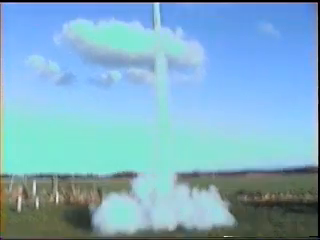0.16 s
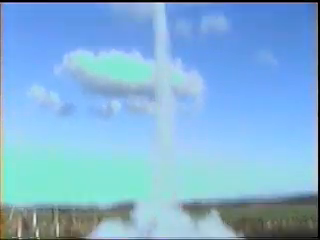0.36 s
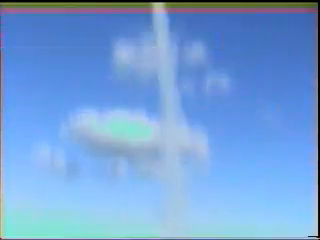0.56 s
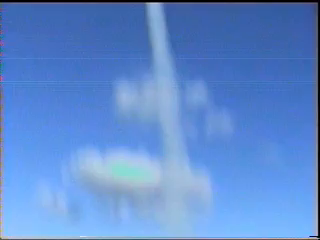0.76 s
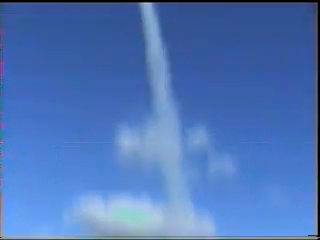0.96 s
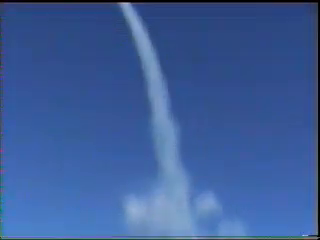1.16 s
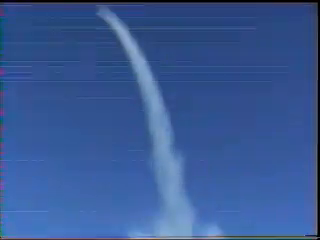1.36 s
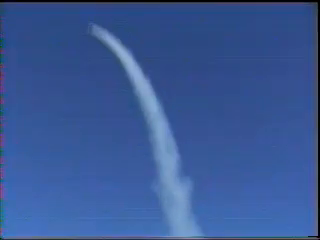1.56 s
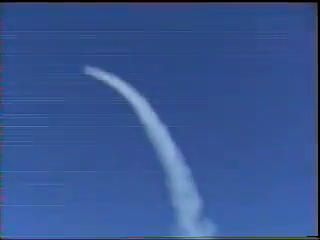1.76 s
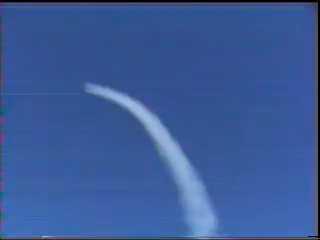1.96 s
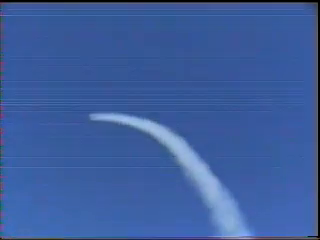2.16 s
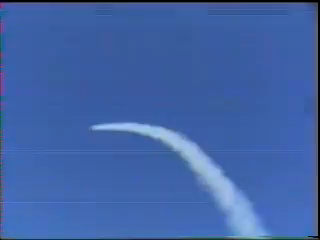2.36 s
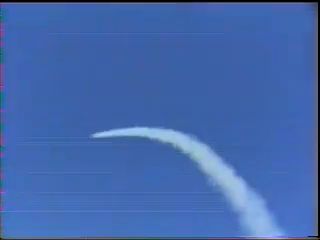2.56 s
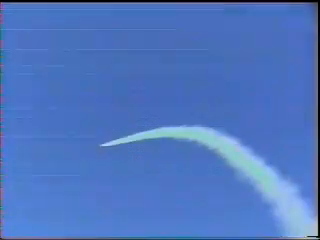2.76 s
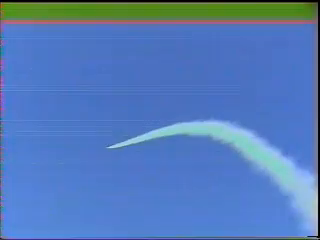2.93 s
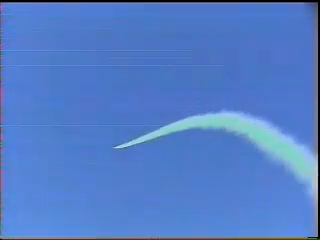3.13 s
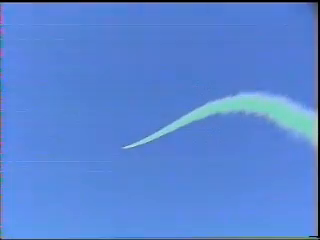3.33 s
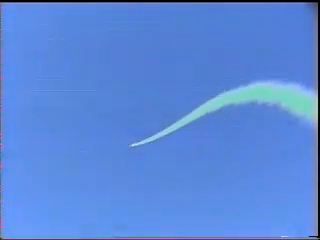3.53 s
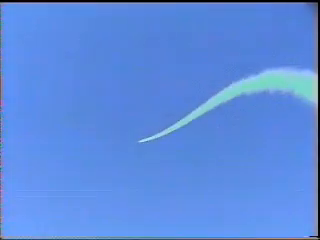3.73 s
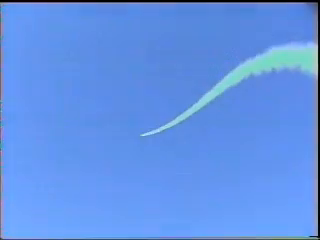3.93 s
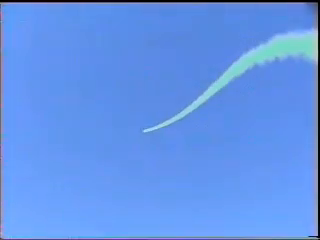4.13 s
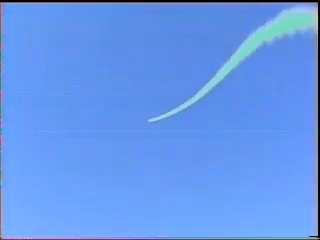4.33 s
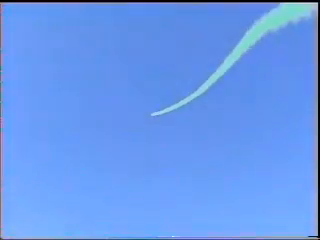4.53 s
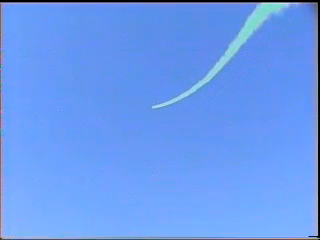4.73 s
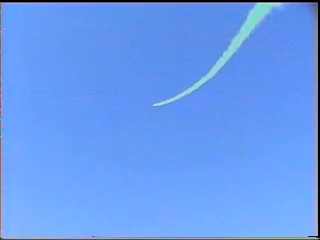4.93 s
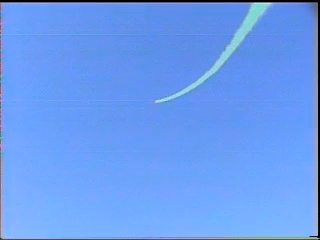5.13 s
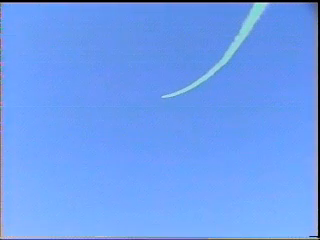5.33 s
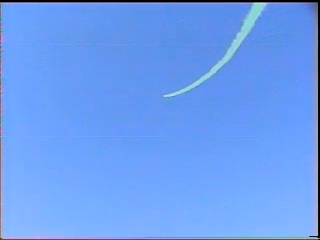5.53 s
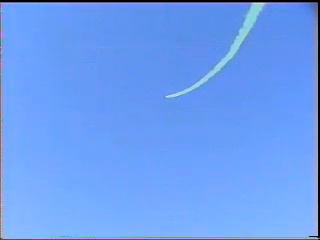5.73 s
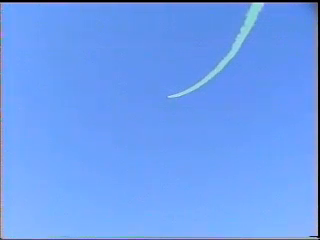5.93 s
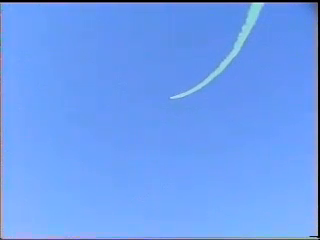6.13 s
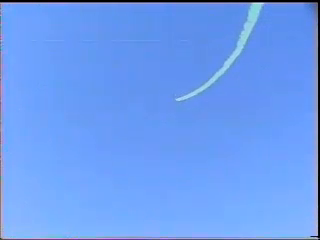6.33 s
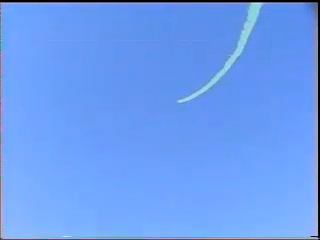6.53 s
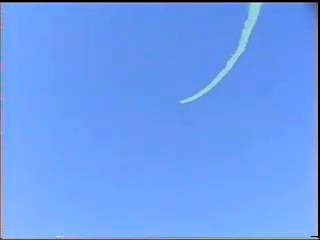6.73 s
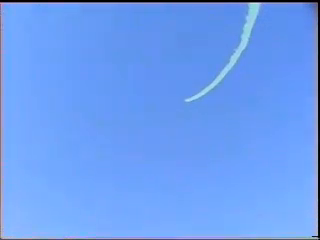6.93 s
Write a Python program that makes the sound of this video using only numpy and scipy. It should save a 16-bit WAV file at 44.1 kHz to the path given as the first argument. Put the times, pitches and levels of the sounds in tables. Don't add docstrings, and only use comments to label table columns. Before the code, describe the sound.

The sound starts mid-roar at 0 s: a solid-fuel hobby rocket leaving its pad about ten metres away on an open grass field. The exhaust is a dense, turbulent rush with strong hiss, slightly crushed and gritty on an old camcorder. From about 0.6 to 2 s it eases as the rocket climbs, fluttering and surging irregularly. Around 2.7 s the hiss brightens a little as the nozzle swings past, then from 3 to 5 s the treble drains away and the roar becomes duller and more midrange, coloured by a short ground echo. By 5 to 6 s it is a distant, muffled rumble, dropping further at 6 s over faint tape hiss and thin whine. At about 6.37 s a small crack and louder dull pop come almost together, with a brief rumble; sound cuts to silence at 6.43 s. Nearly everything is left; the right has only faint leakage and buzz.

```python
import sys
import numpy as np
from scipy import signal
from scipy.fft import rfft, irfft
from scipy.io import wavfile
from scipy.ndimage import uniform_filter1d

SR = 44100
rng = np.random.default_rng(int(sys.argv[2]) if len(sys.argv) > 2 else 0)


def attenuation_scalar(level_db):
    decades = np.asarray(level_db, float) / 20
    return 10 ** decades


def store_wav(level_fs):
    pcm = np.round(np.clip(np.atleast_2d(level_fs), -1, 1) * 32767)
    wavfile.write(sys.argv[1], SR, pcm.T.astype(np.int16))


N = 308011


def level(x, db):
    return x * attenuation_scalar(db) / np.sqrt(np.mean(x ** 2))


def shaped(points, x):
    hz = np.arange(N // 2 + 1) * SR / N + 1e-3
    at_hz, db = np.transpose(points)
    gain_db = np.interp(np.log(hz), np.log(at_hz), db, right=-120)
    return hz, rfft(x) * attenuation_scalar(gain_db)


def walk(rate):
    hold = int(SR / rate)
    steps = np.repeat(rng.standard_normal(N // hold + 1), hold)
    slewed = uniform_filter1d(uniform_filter1d(steps, hold), hold)
    return 1.3 * slewed[:N]


# start_s [s], level_db of the roar [dB], path_m through the air [m]
FLIGHT_PATH = [(0.0, -29, 10), (0.3, -29, 50), (0.6, -32, 51), (1.0, -32.5, 110), (1.75, -33, 100),
               (2.25, -34.5, 120), (2.75, -34, 220), (3.0, -35, 150), (3.3, -33, 250), (3.75, -33, 325),
               (4.25, -35, 400), (4.75, -35, 465), (5.25, -37, 635), (5.5, -38, 760), (5.75, -38, 720),
               (6.0, -42, 700), (6.34, -42.3, 930)]
# pitch_hz [Hz], level_db [dB per Hz]
EXHAUST_COLOUR = [(20, -14.5), (60, -13), (120, -9.5), (340, -5), (650, -4), (1130, -2.5), (1820, -4.5),
                  (2370, -3), (2800, -6.5), (3600, -22.5), (4400, -28), (5200, -35.5), (6200, -50.5),
                  (8000, -65)]
TILT_ANCHORS_HZ = [45, 250, 2400, 4300]


def exhaust_tilts(t, roar_db, path_km):
    aim_db = 2.5 * np.exp(-((t - 2.68) / 0.5) ** 2)
    hiss_db = aim_db - 14.5 * path_km
    sizzle_db = -44.5 * path_km
    thinning = attenuation_scalar(-1.0 * t - 44.5 * path_km)
    murmur = attenuation_scalar(-59.5 - roar_db)
    rumble_db = 10 * np.log10(thinning ** 2 + murmur ** 2)
    return [db - np.mean(db) for db in (rumble_db, 0 * roar_db, hiss_db, sizzle_db)]


def rocket(gain_db=11.0, shift=-0.59, flicker_db=1.0, steep=0.024, surge_db=0.24):
    t = np.arange(N) / SR
    start_s, *columns = np.transpose(FLIGHT_PATH)
    roar_db, path_m = (np.interp(t, start_s, c) for c in columns)
    tilts = exhaust_tilts(t, roar_db, path_m / 1000)
    hz, spectrum = shaped(EXHAUST_COLOUR, rng.standard_normal(N))
    spectrum = spectrum / np.std(irfft(spectrum, N))
    out, surge, patch = 0, walk(9), walk(3)
    for octave in np.arange(-17, 10) / 3:
        centre_hz = 1000 * 2 ** octave
        overlap = np.clip(1 - 3 * abs(np.log2(hz / centre_hz)), 0, 1)
        band = irfft(spectrum * overlap, N)
        patch = (patch + walk(4)) / np.sqrt(2)
        tilt_db = 0
        for weights, change_db in zip(np.eye(4), tilts):
            tilt_db = tilt_db + np.interp(np.log(centre_hz), np.log(TILT_ANCHORS_HZ), weights) * change_db
        mids = max(1 - abs(np.log2(centre_hz / 800)), 0)
        tilt_db = tilt_db + mids * shift * tilts[2]
        out = out + band * attenuation_scalar(tilt_db + 0.4 * patch + flicker_db * walk(14))
    out = out + steep * (out ** 2 - uniform_filter1d(out ** 2, size=120))
    return out * attenuation_scalar(roar_db + gain_db + surge_db * surge)


# start_s [s], peak [full scale], pitch_hz of the swing [Hz], dip before it [share of peak]
MOTOR_POPS = [
    (6.3662, .12, 560, 1.1),
    (6.3732, .37, 195, .6),
    (6.382, .03, 420, .7),
]


def motor_pops():
    t, out = np.arange(N) / SR, 0
    for start_s, peak, pitch_hz, dip_share in MOTOR_POPS:
        turn = (t - start_s) * pitch_hz
        dip = dip_share * np.exp(-((turn + .45) / .27) ** 2)
        slam = np.exp(-(turn / .135) ** 2)
        settling = .2 * np.exp(-((turn - .4) / .25) ** 2)
        out = out + peak * (slam - settling - dip)
    out = signal.sosfilt(signal.butter(1, 30, "high", fs=SR, output="sos"), out)
    since_s = np.maximum(t - 6.352, 0)
    attack_s, rumble_db, fall_db_per_s = 0.0097, -30, 141.5
    swell = np.minimum(since_s / attack_s, 1) ** 2 * attenuation_scalar(rumble_db - fall_db_per_s * since_s)
    low_band = signal.butter(2, [120, 700], "band", fs=SR, output="sos")
    rumble = signal.sosfilt(low_band, rng.standard_normal(N))
    return out + level(rumble, 0) * swell


GRASS_SHARES = (0.08, 0.94)
CAMERA_SHARES = (0.037, 0.21)


def field(x):
    n = np.arange(N)
    t = n / SR
    lag_ms = 22.3 + 8.0 * np.exp(-t / 1.7)
    overhead, grazing = GRASS_SHARES
    ground = overhead + (grazing - overhead) / (1 + np.exp((4.7 - t) / 0.45))
    camera_level, camera_up = CAMERA_SHARES
    body = camera_level + (camera_up - camera_level) * np.exp(-((t - 3.3) / 1.8) ** 2)
    dull = signal.filtfilt(*signal.butter(1, 880, fs=SR), x)
    ground_echo = ground * np.interp(n - lag_ms * SR / 1000, n, dull)
    body_echo = body * np.interp(n - 1.3 * SR / 1000, n, x)
    return x + ground_echo + body_echo


# pitch_hz [Hz], level_db [dB per Hz]
TAPE_HISS = [(20, -40.5), (100, -12.5), (400, -3), (3000, -25.5), (6200, -25.5)]


def camcorder():
    t = np.arange(N) / SR
    _, spectrum = shaped(TAPE_HISS, rng.standard_normal(N))
    hiss = level(irfft(spectrum, N), -55.5)
    whine = level(np.sin(2 * np.pi * 4427 * t), -65)
    return hiss + whine


# multiple [of the drive rate], level_db [dB rms]
DRIVE_BUZZ = [(1, -70), (2, -82), (3, -103), (4, -88), (5, -95), (7, -100), (13, -97), (15, -100),
              (19, -99)]


def drive_buzz():
    t = np.arange(N) / SR
    out = 0
    for multiple, level_db in DRIVE_BUZZ:
        out = out + np.sqrt(2) * attenuation_scalar(level_db) * np.sin(2 * np.pi * multiple * 14.14 * t)
    return out


def scene():
    left = field(rocket() + motor_pops()) + camcorder()
    return np.array([left, np.zeros(N)])


def band_limit(x):
    return signal.sosfilt(signal.butter(12, 15760, fs=SR, output="sos"), x)


def record(dry, ceiling=0.2, knee=2.8, smooth_hz=5300, leak_hz=2800, leak_db=-34.5, bleed_db=-60):
    n = np.arange(N)
    x = dry[0] / (1 + abs(dry[0] / ceiling) ** knee) ** (1 / knee)
    x = signal.sosfilt(signal.butter(6, smooth_hz, fs=SR, output="sos"), x)
    hold_hz = 12496.33
    tick = np.floor(n * hold_hz / SR) * SR / hold_hz
    left = np.interp(tick, n, x)
    leak = signal.sosfilt(signal.butter(1, leak_hz, "high", fs=SR, output="sos"), left)
    leak = signal.sosfilt(signal.butter(1, 9000, fs=SR, output="sos"), leak)
    right = attenuation_scalar(leak_db) * leak + attenuation_scalar(bleed_db) * left + drive_buzz()
    running = n < 6.4297 * SR
    both = np.array([left, right]) * running
    return band_limit(both)


dry = scene()
out = record(dry)
store_wav(out)
```